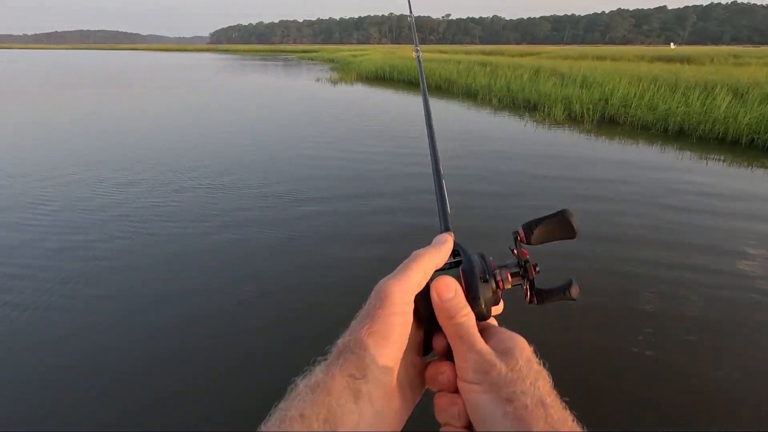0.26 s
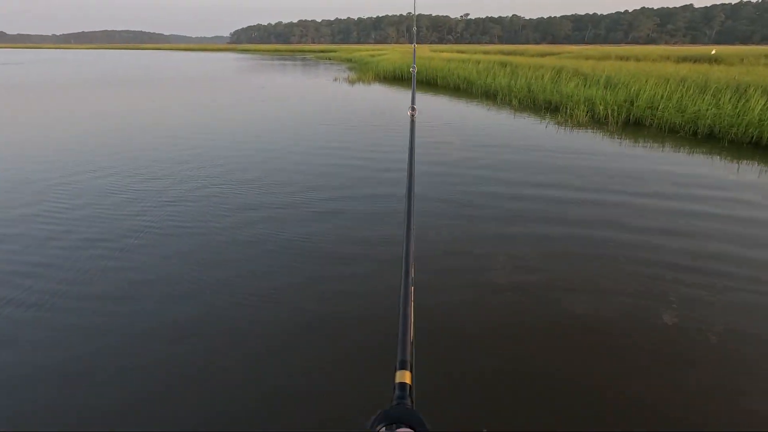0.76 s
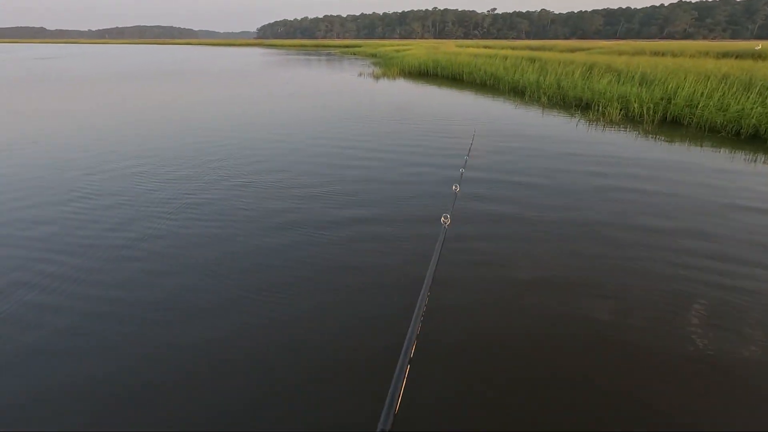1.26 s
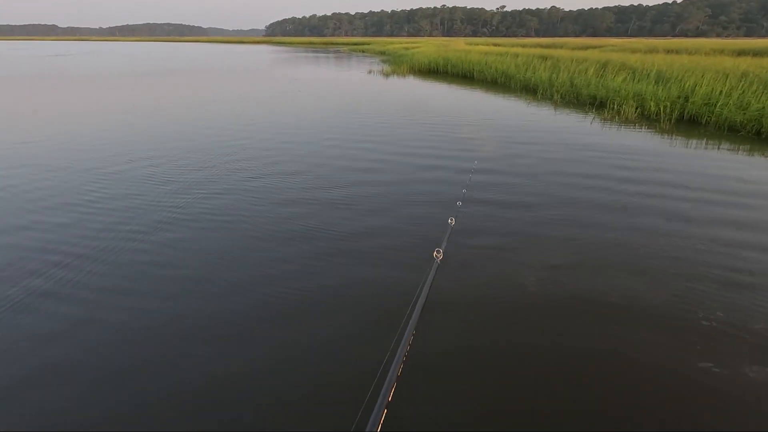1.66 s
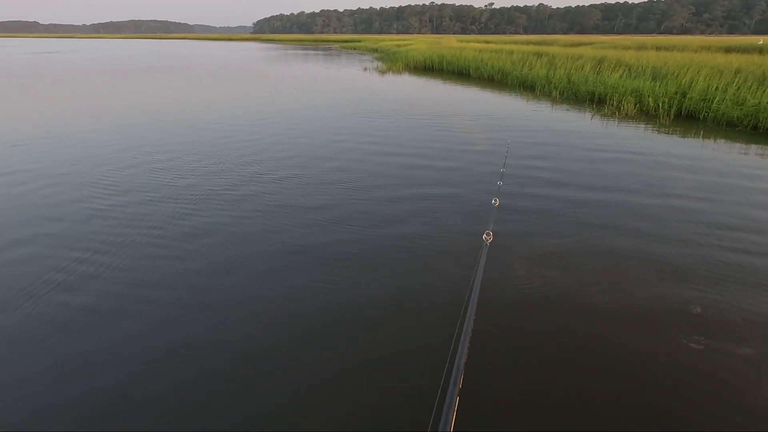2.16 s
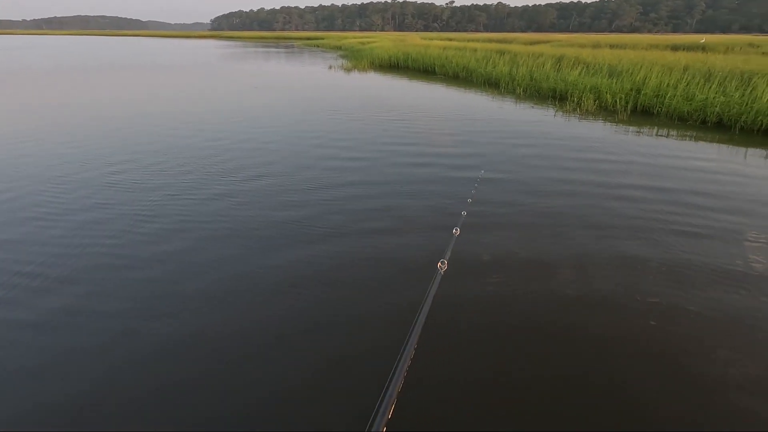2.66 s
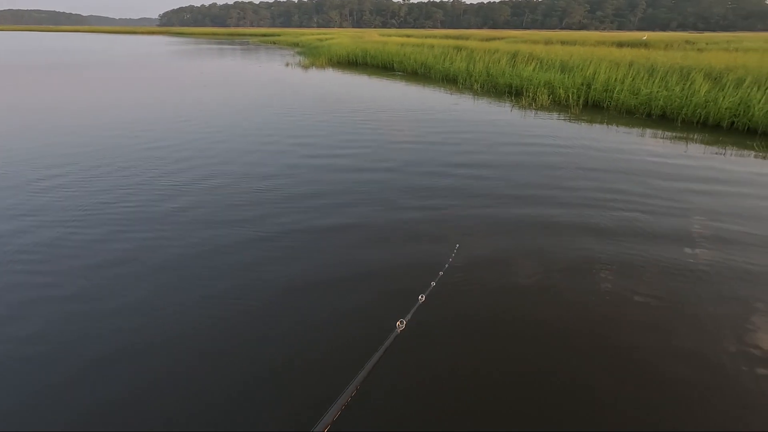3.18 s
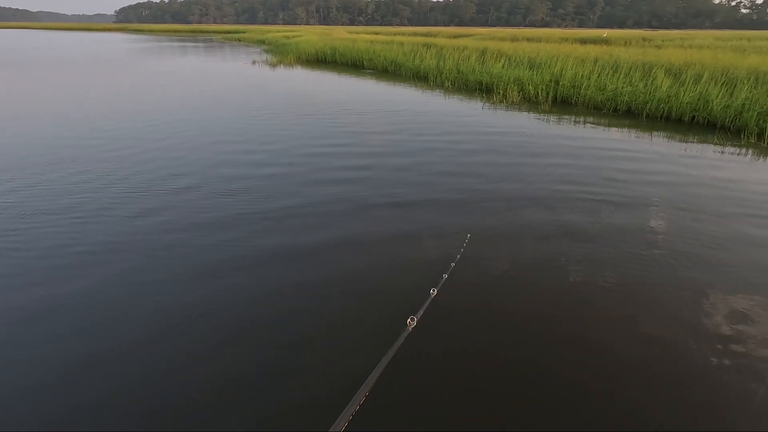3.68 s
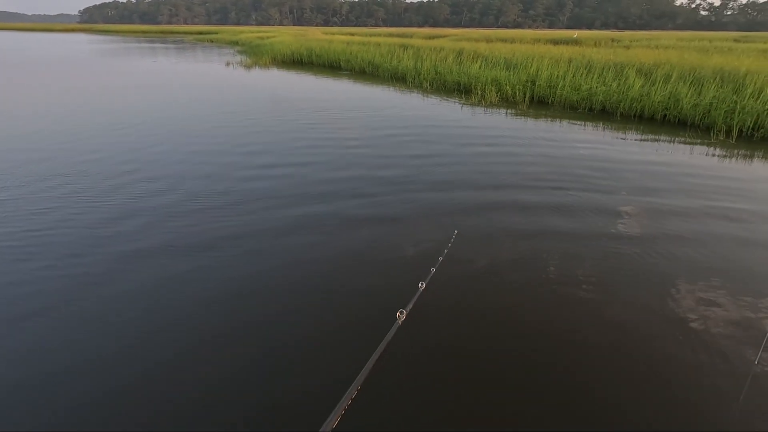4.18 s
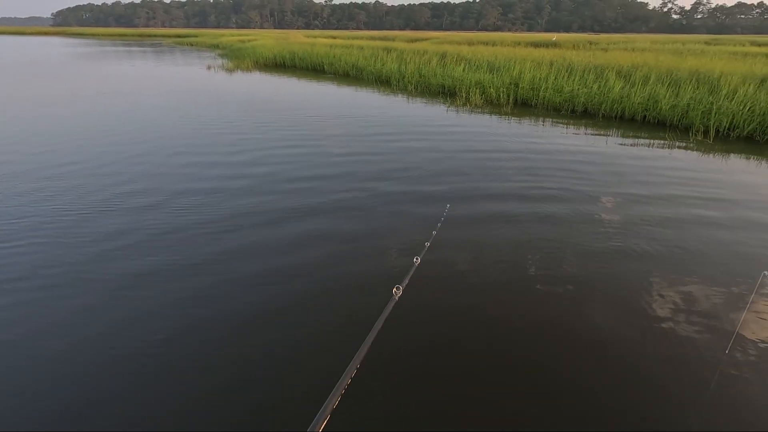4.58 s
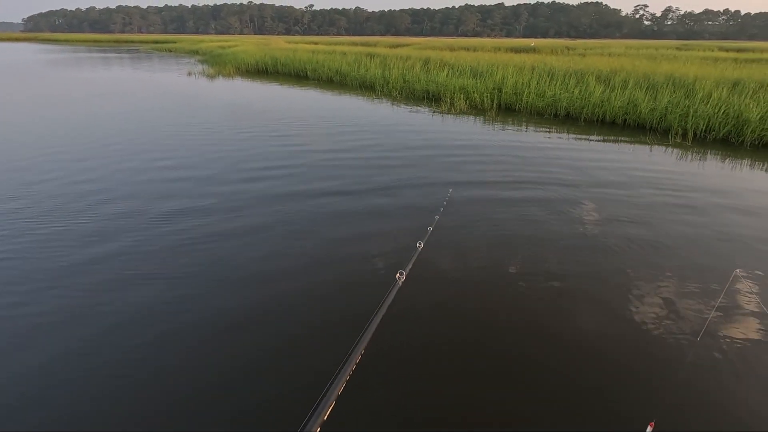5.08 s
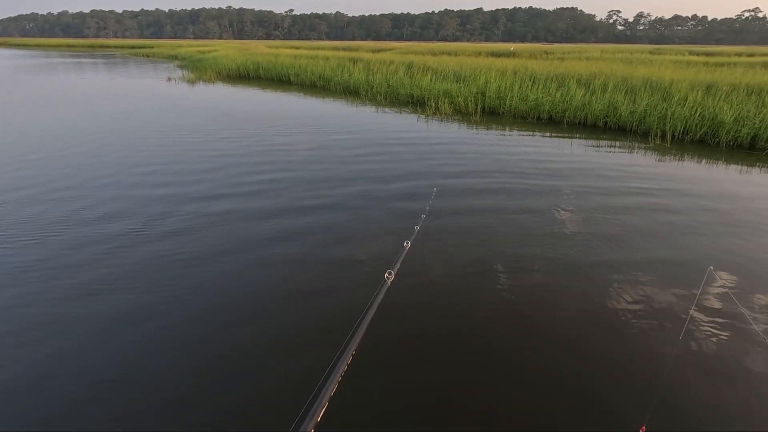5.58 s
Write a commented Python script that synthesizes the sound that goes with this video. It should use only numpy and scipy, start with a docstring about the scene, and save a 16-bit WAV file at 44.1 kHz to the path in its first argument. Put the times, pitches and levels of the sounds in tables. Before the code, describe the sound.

Quiet, open marsh air is heard from a boat through a body-worn microphone, with a very faint, distant motor hum underneath. Soft, deep puffs of air rumble on the microphone for the first three seconds, then settle. Sleeves rustle faintly, a few light ticks sound, and a small bubble plops at 0.6 seconds. At about 1.1 seconds a fishing reel snaps into gear with one sharp, close, dry clack, by far the loudest sound. Light, irregular reel ticks follow until about 3 seconds, with barely audible thin squeaks. The hull gives a dull bump at 2.1 seconds and a softer one at 2.6, with tiny plops near 2.1 and 2.5. The second half is calmer, with just a few very faint ticks. Distant birds give thin, mostly falling whistles and chips throughout, with one clearer high chirp at about 4.7 seconds.

```python
"""Angler on a salt marsh

In a boat on still water, just after a cast: sleeves rustle, the baitcasting reel snaps into gear with
one sharp clack, then ticks and squeaks as it takes up line. Bubbles plop; shifting weight bumps the
hull. Air rumbles on a body-worn microphone; birds whistle far off over a faint motor hum."""
import sys
import numpy as np
from scipy import signal
from scipy.fft import rfft, irfft
from scipy.io import wavfile
from scipy.ndimage import uniform_filter1d

SR = 44100
rng = np.random.default_rng(int(sys.argv[2]) if len(sys.argv) > 2 else 0)


def to_wav(s):
    """Save 16-bit WAV."""
    ch = np.atleast_2d(s).T  # columns
    pcm = np.round(np.clip(ch, -1, 1) * 32767)  # PCM
    wavfile.write(sys.argv[1], SR, pcm.astype(np.int16))


N = 257594
T = np.arange(N) / SR


def undb(db):
    """Decibels to gain."""
    return 10 ** (np.asarray(db) / 20)


def unit(x):
    """Scale to rms 1."""
    return x / np.sqrt(np.mean(x ** 2))


def colour(x, spectrum):
    """Shape x by (frequency [Hz], level [dB]) points, rolling off past the ends; rms 1."""
    hz, db = np.transpose(spectrum)
    bin_hz = np.maximum(np.arange(N // 2 + 1) * SR / N, 1)
    skirts = np.minimum(bin_hz / hz[0], 1) ** 2 * np.minimum(hz[-1] / bin_hz, 1) ** 2
    gain = undb(np.interp(np.log(bin_hz), np.log(hz), db))
    return unit(irfft(rfft(x) * skirts * gain, N))


def noise():
    """White noise."""
    return rng.standard_normal(N)


def walk(rate_hz):
    """Random steps, smoothed twice; rms 1."""
    hold = max(int(SR / rate_hz), 1)
    steps = np.repeat(rng.standard_normal(N // hold + 1), hold)
    return unit(uniform_filter1d(uniform_filter1d(steps, hold), hold)[:N])


def fade(t, t60_s):
    """Exponential decay from t = 0, silent before."""
    return (t >= 0) * np.exp(-np.log(1000) * np.maximum(t, 0) / t60_s)


def add(out, start_s, x):
    """Mix x into out at start_s."""
    i = max(int(start_s * SR), 0)
    out[i:i + len(x)] += x[:N - i]


def swells(events, db_column=2):
    """Power sum of bell curves; rows open with (centre [s], width at half height [s])."""
    bells = (undb(row[db_column]) * 0.5 ** ((2 * (T - row[0]) / row[1]) ** 2) for row in events)
    return np.sqrt(sum(bell ** 2 for bell in bells))


def marsh_air(level_db=-57.5):
    """Still open air: steady noise, mostly low."""
    # air spectrum (frequency [Hz], density [dB])
    spectrum = [(29, -27), (50, 6), (81, -3.5), (116, -3.5), (151, -12.5), (187, -10.5), (250, -14.5),
                (434, -20), (489, -19.5), (1050, -30.5), (1470, -28.5), (2620, -31.5), (2820, -34),
                (4780, -36.5), (15500, -46.5)]
    return colour(noise(), spectrum) * undb(level_db + 0.5 * walk(3.5))


def motor(speed_waver=0.0062):
    """A distant motor: its partials waver together in pitch."""
    # hum partials (frequency [Hz], level [dB])
    partials = [(126, -73), (189.5, -72.5), (253, -77.5)]
    warped_s = np.cumsum(1 + speed_waver * walk(11)) / SR
    return sum(np.sqrt(2) * undb(db + 2 * walk(3.4)) * np.sin(2 * np.pi * hz * warped_s)
               for hz, db in partials)


def buffet(puff_gain_db=1, breeze_db=-52):
    """Slow eddies and body movement press on the microphone: puffs over a light breeze."""
    # eddy spectrum (frequency [Hz], density [dB])
    spectrum = [(4.7, -31), (8.0, -0.5), (16, 5), (26, 1), (41, -11), (157, -35.5), (200, -34.5),
                (260, -61.5), (440, -120)]
    # air puffs as the angler moves (centre [s], width [s], relative level [dB])
    puffs = [(.17, 0.28, -38), (.51, 0.15, -34.5), (.71, 0.149, -35), (1.0, 0.66, -42.5), (1.44, 0.49, -38),
             (2.13, 0.2, -38), (2.41, 0.37, -40), (2.67, 0.0998, -40.5), (2.87, 0.22, -32),
             (3.15, 0.43, -40.5), (3.55, 0.509, -52.5)]
    eddies = colour(noise(), spectrum)
    running_rms = np.sqrt(uniform_filter1d(eddies ** 2, SR // 5))
    breeze = undb(breeze_db + 2.2 * walk(6))
    return eddies / running_rms * np.hypot(swells(puffs) * undb(puff_gain_db), breeze)


def sleeves(rub_gain_db=1.5, hiss_gain_db=2.3, grain_db=2.5):
    """Cloth slides in tiny uneven slips, with a soft low swish beneath."""
    # cloth spectra (frequency [Hz], density [dB])
    rub_spectrum = [(500, -9.5), (900, -4), (1350, -3), (1900, 2.5), (2800, -7), (4500, -11), (7000, -21.5)]
    hiss_spectrum = [(2000, -15.5), (3500, -4), (5500, 0), (9500, -1), (12000, -10), (15000, -25)]
    swish_spectrum = [(250, -25.5), (420, -8), (540, -1.5), (750, -5.5), (1100, -13), (2000, -23.5)]
    # sleeve and hand strokes (centre [s], width [s], relative rub [dB], relative hiss [dB])
    strokes = [(.12, 0.65, -73.5, -75.5), (.28, 0.0816, -65.5, -81), (.63, 0.12, -64, -73.5),
               (.76, .08, -71, -77), (1.147, .045, -67, -71), (1.3, 0.22, -66.5, -85.5),
               (1.48, 0.175, -72, -85), (1.68, 0.208, -67, -89.5), (1.89, 0.227, -72, -89.5),
               (2.12, 0.15, -71, -84), (2.31, 0.2, -67, -86), (3.6, 0.477, -77.5, -91.5)]
    # low swishes (centre [s], width [s], level [dB])
    swishes = [(.13, 0.338, -65), (.6, 0.19, -66.5), (1.12, .13, -60), (1.73, .22, -66.5),
               (1.91, .17, -57.5), (2.25, 0.7, -70), (3.2, 0.546, -72), (4.35, .26, -70.5)]
    slips = unit(undb(grain_db * walk(500)))
    rub = colour(noise() * slips, rub_spectrum) * swells(strokes) * undb(rub_gain_db)
    hiss = colour(noise() * slips, hiss_spectrum) * swells(strokes, db_column=3) * undb(hiss_gain_db)
    swish = colour(noise(), swish_spectrum) * swells(swishes) * undb(1.1 * walk(30))
    return rub + hiss + swish


def ticks(tilt_per_octave=0.27, detune_spread=0.04, rise_s=0.000082, lowpass_hz=7500):
    """Light contacts briefly ring the reel's side plate, each with its own brightness."""
    # reel and grip contacts (time [s], relative level [dB], brightness [dB])
    contacts = [(0.319, -56.5, -4), (0.378, -44.5, -20), (0.4108, -44, -10), (0.7385, -50.5, 7),
                (0.779, -48, -32), (0.9193, -49.5, 1), (1.052, -34, -7), (1.0549, -29, -13),
                (1.093, -46, -8.5), (1.3659, -39.5, -11), (1.4244, -38.5, -4), (1.4279, -34.5, 0),
                (1.5197, -41, -13), (1.583, -44.5, -20), (1.5863, -41, -15.5), (1.7083, -43, -10.5),
                (1.7637, -39.5, -16), (1.767, -39, -9), (2.3239, -40.5, -6), (2.852, -48.5, -2),
                (2.9129, -38, -15.5), (2.9175, -39.5, -11), (3.535, -53, -22.5), (4.539, -56, -18),
                (5.637, -54, -22), (5.799, -55, -10)]
    # side plate modes (frequency [Hz], relative level [dB], t60 [s])
    modes = [(935, -10, 0.012), (1587, 0, 0.0061), (1950, 0.5, .009), (3601.7, -0.5, .004),
             (4570, -0.5, 0.0045), (6800, -8, 0.004), (9400, -9.5, 0.0028)]
    t, out = T[:SR // 30], np.zeros(N)
    hz, mode_db, t60_s = np.transpose(modes)[:, :, None]
    for start_s, db, bright_db in contacts:
        detune, phase = rng.standard_normal((2, len(hz), 1))
        gains = undb(mode_db + tilt_per_octave * bright_db * np.log2(hz / hz[0]))
        tones = np.sin(2 * np.pi * hz * (1 + detune_spread * detune) * t + phase)
        ring = np.sum(gains * fade(t, t60_s) * tones, axis=0) * (1 - np.exp(-t / rise_s))
        add(out, start_s, undb(db) * ring / np.abs(ring).max())
    return signal.sosfilt(signal.butter(2, lowpass_hz, fs=SR, output="sos"), out)


def echoes(x, boat_gain_db=-45.5, bank_gain_db=-63, bank_delay_s=0.039, bank_lowpass_hz=2200):
    """Quick scatter off boat and angler, then a soft, duller echo from the grass bank."""
    # boat echo spectrum (frequency [Hz], density [dB])
    spectrum = [(150, 3), (350, 5.5), (550, 6.5), (850, -2.5), (1400, 0), (2200, -5), (4000, -16.5),
                (7000, -15), (9500, -19), (13000, -22)]
    scatter = colour(noise(), spectrum)
    dull = signal.sosfilt(signal.butter(1, bank_lowpass_hz, fs=SR, output="sos"), scatter)
    boat = scatter * fade(T - 0.003, t60_s=0.075)
    bank = dull * fade(T - bank_delay_s, t60_s=0.2) * (1 - fade(T - bank_delay_s, t60_s=0.046))
    response = undb(boat_gain_db) * boat + undb(bank_gain_db) * bank
    return signal.fftconvolve(x, response[:SR])[:N]


def whistle(notes, waver, waver_hz, flutter_db=3, octave_db=-26, edge_s=0.0047):
    """Each bird note slides along an arc, swells quickly and fades, fluttering in the air."""
    out = np.zeros(N)
    pitch_drift = 1 + waver * walk(waver_hz)
    drift_db = flutter_db * walk(90)
    for start_s, length_s, start_hz, end_hz, sag_hz, db in notes:
        on = (T >= start_s) & (T < start_s + length_s)
        progress = (T[on] - start_s) / length_s
        slide = progress ** 0.65  # fastest at first
        hz = start_hz + (end_hz - start_hz) * slide - sag_hz * (1 - (2 * slide - 1) ** 2)
        phase = 2 * np.pi * np.cumsum(hz * pitch_drift[on]) / SR
        tone = np.sin(phase) + undb(octave_db) * np.sin(2 * phase)
        swell_db = np.interp(progress, [0, 0.264, 1], [-6, 0, -7.5])
        edges = np.clip(np.minimum(progress, 1 - progress) * length_s / edge_s, 0, 1)
        out[on] += np.sqrt(2) * edges * undb(db + swell_db + drift_db[on]) * tone
    return out


def birds(chip_gain_db=-1.65, far_chips_per_s=3.6, far_hz=2980, far_length_s=0.05, echo_db=-13):
    """Nearly pure whistles and hoarser far-off chips, scattered by the grass."""
    # whistles (time [s], length [s], start [Hz], end [Hz], mid-glide sag [Hz], level [dB])
    notes = [(.455, 0.065, 4300, 4120, -1.5, -70), (.635, 0.147, 2513, 3050, -230, -75),
             (.875, 0.089, 5480, 5320, 138, -70.5), (1.335, .15, 5710, 4700, 148, -69.5),
             (1.505, 0.057, 4370, 4130, 19, -76), (1.61, 0.16, 4200, 3840, 58, -76),
             (2.52, .12, 4240, 3680, -88, -77.5), (2.635, .085, 3640, 3500, -30, -77.5),
             (2.972, .16, 5900, 4782, 310, -68), (3.105, .19, 4530, 4000, 70, -78.5),
             (4.72, 0.043, 5900, 5150, 60, -56), (4.748, 0.13, 5040, 4560, 40, -70),
             (4.88, .16, 4410, 4060, 19.5, -77), (5.258, .1, 5656, 5410, 360, -70)]
    # falling chips (time [s], start [Hz], end [Hz], length [s], relative level [dB])
    timed_chips = [(0.556, 3810, 3450, .05, -74), (1.233, 3303, 3156, 0.0483, -75),
                   (3.387, 4250, 3540, .04, -76), (3.448, 5031, 4598, 0.056, -76),
                   (4.057, 4251, 3320, 0.032, -75.5), (4.128, 5370, 4590, 0.0415, -75.5),
                   (4.263, 5170, 4600, .033, -73), (4.316, 3210, 2402, 0.051, -76),
                   (4.64, 3270, 2643, 0.0463, -78)]
    chips = [(start_s, length_s, start_hz, end_hz, 0, db)
             for start_s, start_hz, end_hz, length_s, db in timed_chips]
    # birds farther out chip at random
    for when, pitch, faintness in rng.random((int(far_chips_per_s * N / SR), 3)):
        hz = far_hz * 2 ** (pitch - 0.5)
        chips.append((when * N / SR, far_length_s, hz, 0.82 * hz, 0, -79 - 4 * faintness))
    calls = whistle(notes, waver=0.006, waver_hz=150)
    calls += undb(chip_gain_db) * whistle(chips, waver=0.016, waver_hz=1201.2)
    grass = (noise() * fade(T - 0.012, t60_s=0.2))[:SR]
    return calls + undb(echo_db) * signal.fftconvolve(calls, grass / np.linalg.norm(grass))[:N]


def plops(rise_s=0.0061):
    """Bubbles at the waterline: damped tones gliding up or down."""
    # bubbles (time [s], level [dB], start pitch [Hz], t60 [s], glide [octaves/s])
    bubbles = [(.571, -41, 884, 0.063, 5.5), (2.108, -46, 845, .06, -7.5), (2.512, -48.5, 660.4, 0.068, -2)]
    t, out = T[:SR // 5], np.zeros(N)
    for start_s, db, hz, t60_s, glide in bubbles:
        phase = 2 * np.pi * np.cumsum(hz * 2 ** (glide * t)) / SR
        add(out, start_s, undb(db) * np.sin(phase) * fade(t, t60_s) * (1 - np.exp(-t / rise_s)))
    return out


def metal_ring():
    """Friction makes a small metal ring, the line guide or lure, sing in thin, scratchy squeaks."""
    # ring modes (frequency [Hz], bandwidth [Hz], relative level [dB])
    modes = [(12550, 130, 2), (13300, 150, -3.5), (14700, 200, -7.5)]
    # squeaks (time [s], length [s], level [dB])
    squeaks = [(.575, .04, -82), (1.358, 0.102, -79), (1.555, 0.164, -82), (2.096, 0.077, -79),
               (2.235, 0.052, -71)]
    friction = noise()
    ring = sum(undb(db) * signal.lfilter(*signal.iirpeak(hz, hz / width_hz, SR), friction)
               for hz, width_hz, db in modes)
    envelope = sum(undb(db) * np.sin(np.pi * np.sqrt(np.clip((T - start_s) / length_s, 0, 1)))
                   for start_s, length_s, db in squeaks)
    return unit(ring) * envelope


def clack(rise_s=0.00054, lowest_mode_lag_s=0.00132, crack_gain_db=-13):
    """The clutch strikes the reel's frame; bending waves bring the low modes slightly later."""
    # frame modes (frequency [Hz], relative level [dB], t60 [s])
    modes = [(550, -14, 0.017), (699, -17, 0.015), (856, -5.5, 0.021), (1090, -15, 0.021),
             (1475, -10.5, 0.013), (1780, -4, 0.012), (2260, -8.5, 0.015), (2700, -10.5, 0.012),
             (3030, -5.5, 0.011), (3626, -15.5, 0.016), (4159, -1.49, 0.012), (4604, 3, 0.008),
             (5540, -6.5, 0.0088), (6091, -3.5, 0.01), (6940, -1.3, 0.011), (7380, -3, 0.0087),
             (8094, -9, 0.0077), (8623, -12.5, 0.014), (9233, 2.5, 0.0091), (9760, -1.5, 0.012),
             (10450, -9.0, 0.012), (10900, -13, 0.012), (12250, -14.5, 0.01), (13800, -10, 0.0065),
             (15600, -13.5, 0.009)]
    # impact noise spectrum (frequency [Hz], density [dB])
    crack_spectrum = [(300, -11), (800, -0.5), (2000, 1.5), (4500, -6), (9500, -10), (12000, -10.5),
                      (16000, -15)]
    # clutch trips, then slams home (time [s], gain [dB])
    strikes = [(1.064, -28), (1.066, -7.5)]
    t, out = T[:SR // 10], np.zeros(N)
    ring = 0
    for k, (hz, db, t60_s) in enumerate(modes):
        age_s = np.maximum(t - lowest_mode_lag_s * np.sqrt(modes[0][0] / hz), 0)
        envelope = fade(age_s, t60_s) * (1 - np.exp(-age_s / rise_s))
        ring += (-1) ** k * undb(db) * np.sin(2 * np.pi * hz * age_s) * envelope
    crack = colour(noise(), crack_spectrum)[:len(t)] * fade(t, t60_s=0.021) * (1 - np.exp(-t / rise_s))
    for start_s, db in strikes:
        add(out, start_s, undb(db) * (ring + undb(crack_gain_db) * crack))
    return out


def hull():
    """Shifting weight bumps the boat: a decaying noise band stands for its dense panel modes."""
    # dull bumps (time [s], level [dB], centre [Hz], t60 [s])
    bumps = [(2.125, -36, 83, 0.26), (2.123, -52.5, 350, 0.102), (2.613, -47, 323, 0.052)]
    out = np.zeros(N)
    for start_s, db, hz, t60_s in bumps:
        panels = colour(noise(), [(hz / 2, -12), (hz, 0), (2 * hz, -16)])
        attack = 1 - fade(T - start_s, t60_s=0.0117)
        out += undb(db) * attack * fade(T - start_s, t60_s) * panels
    return out


def scene():
    """All sources centred; only a faint hiss differs between channels."""
    reel = clack() + ticks()
    mid = reel + echoes(reel) + sleeves() + metal_ring() + plops() + hull()
    mid = mid + birds() + buffet() + marsh_air() + motor()
    hiss = undb(-88.5) * colour(noise(), [(200, -3.5), (2000, -6), (9000, 0.5), (13000, -3.5)])
    return np.array([mid + hiss, mid - hiss])


def record(dry):
    """Soft clip, then a steep low-pass."""
    cutoff_hz = 15800
    return signal.sosfilt(signal.ellip(8, 0.2, 70, cutoff_hz, fs=SR, output="sos"), np.tanh(dry))


dry = scene()
out = record(dry)
to_wav(out)
```